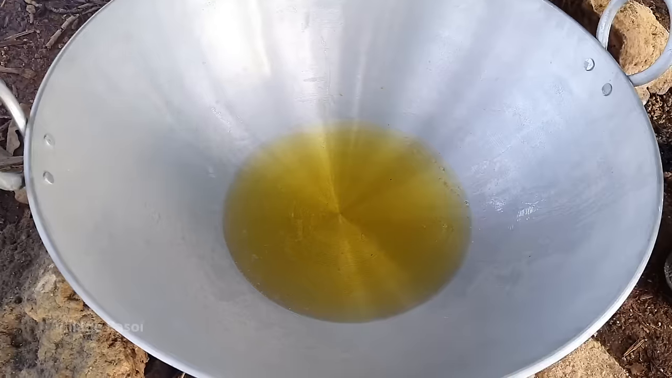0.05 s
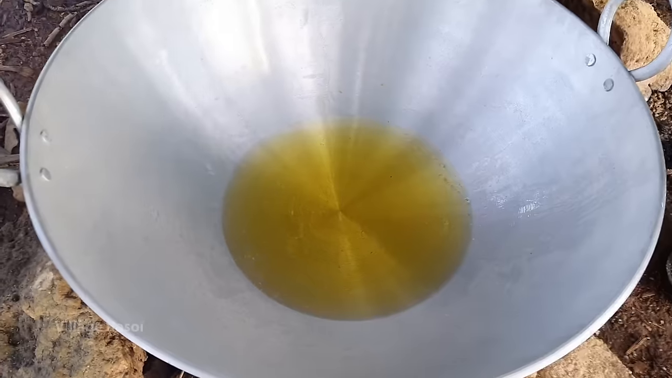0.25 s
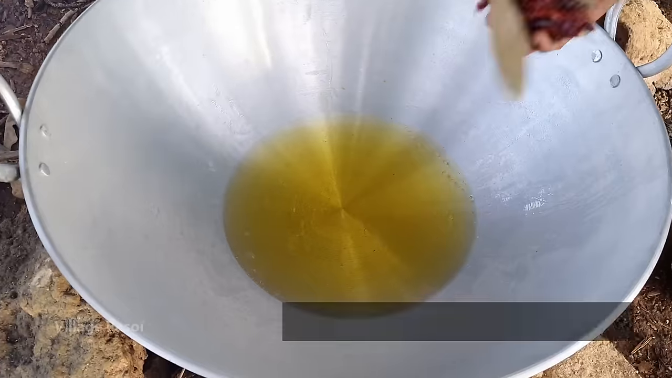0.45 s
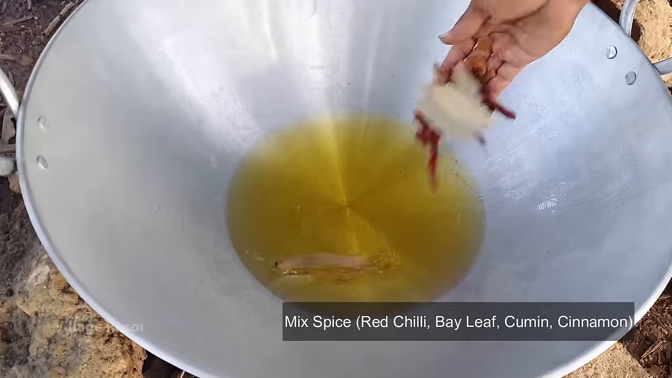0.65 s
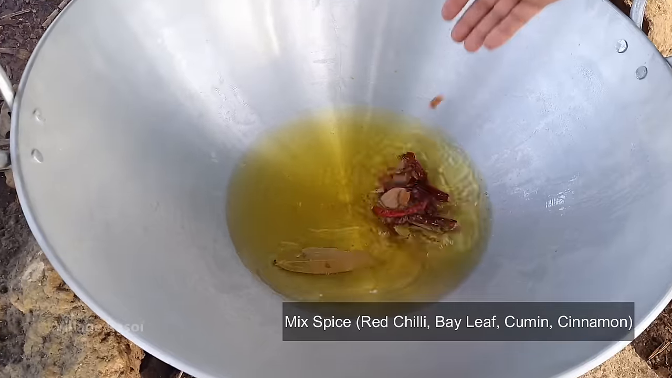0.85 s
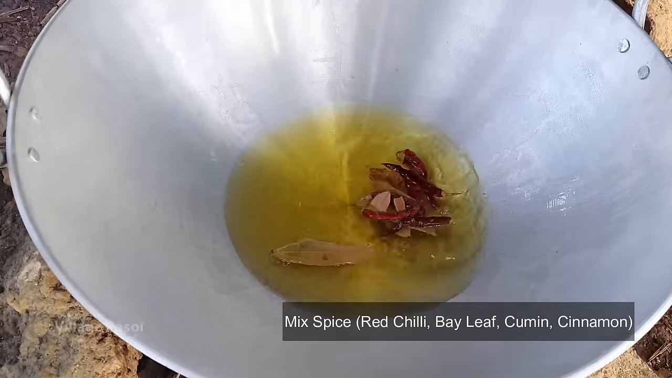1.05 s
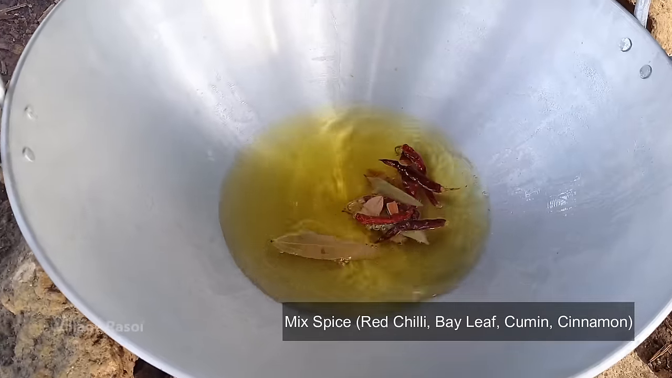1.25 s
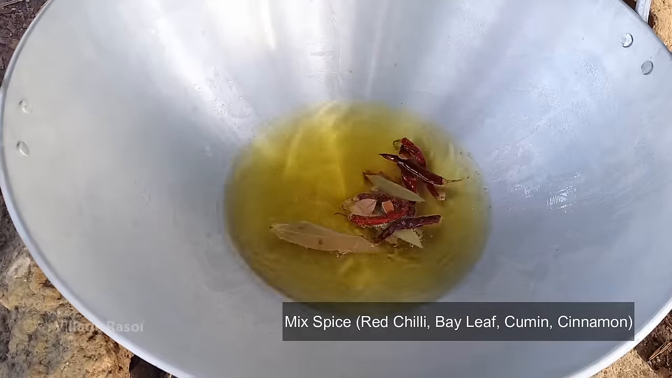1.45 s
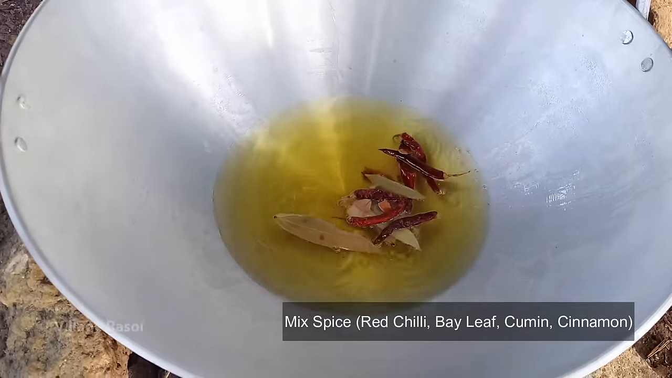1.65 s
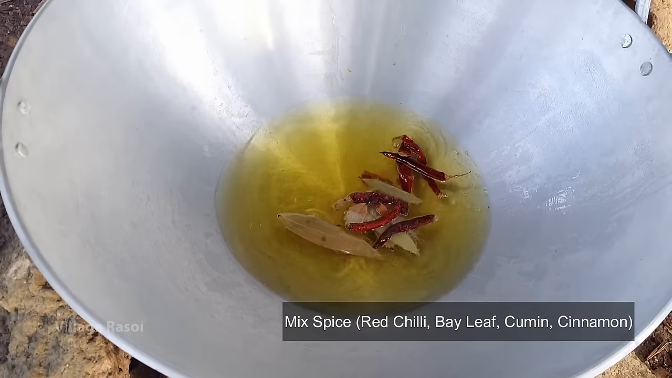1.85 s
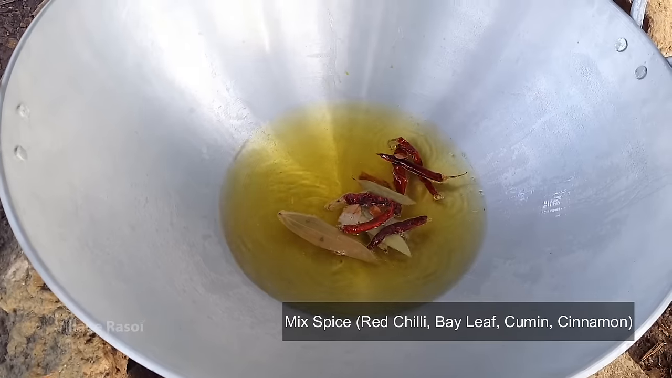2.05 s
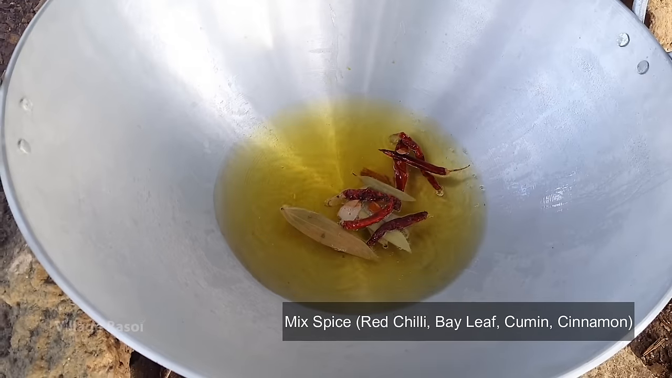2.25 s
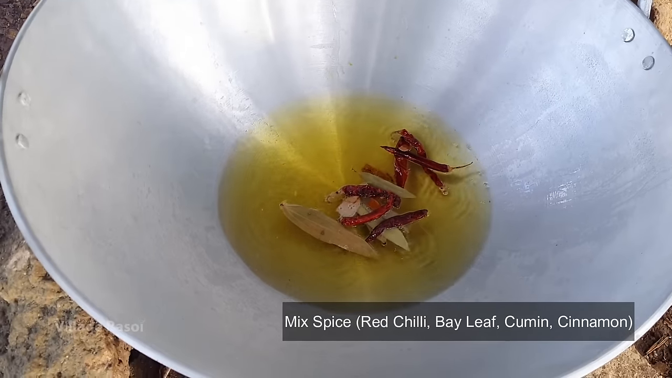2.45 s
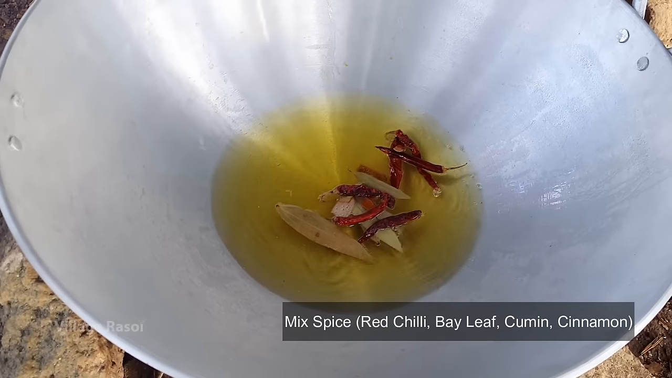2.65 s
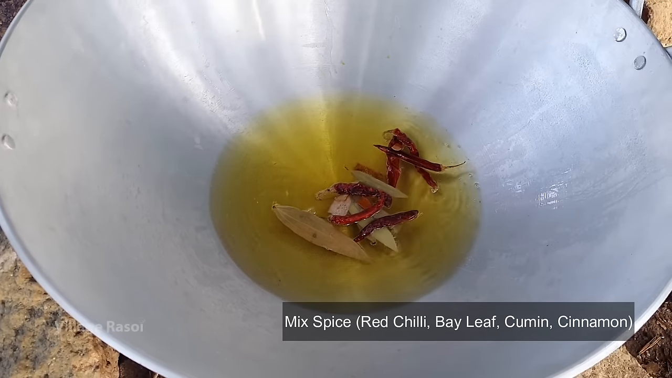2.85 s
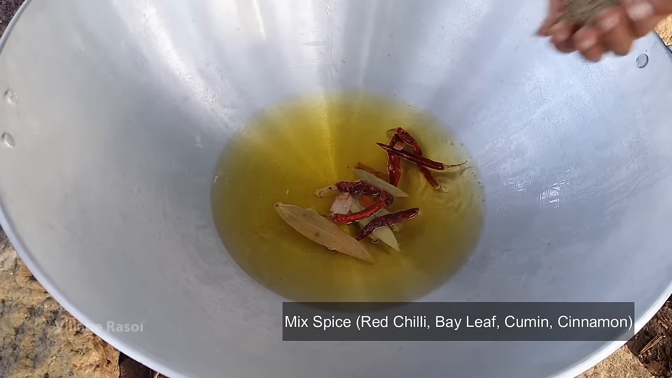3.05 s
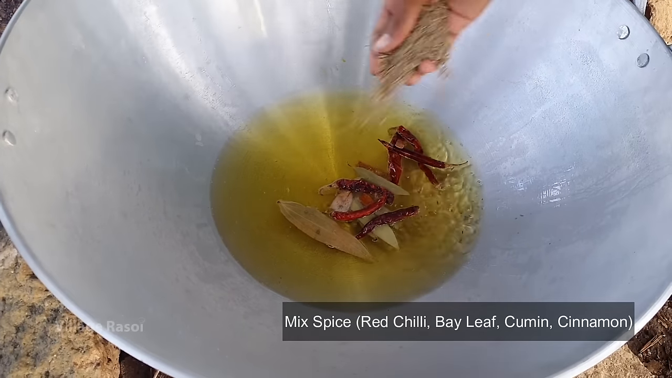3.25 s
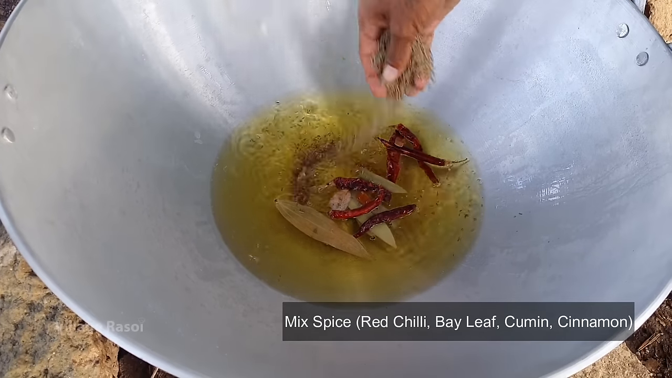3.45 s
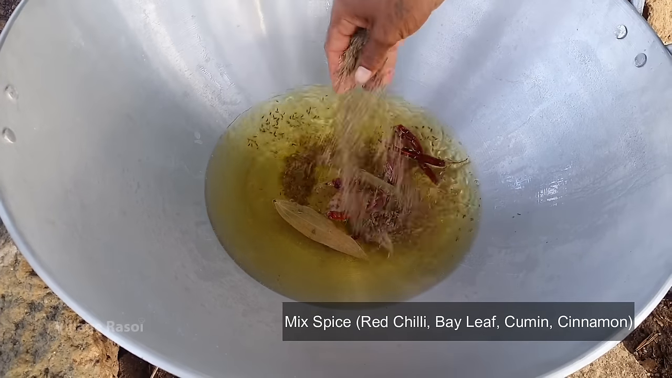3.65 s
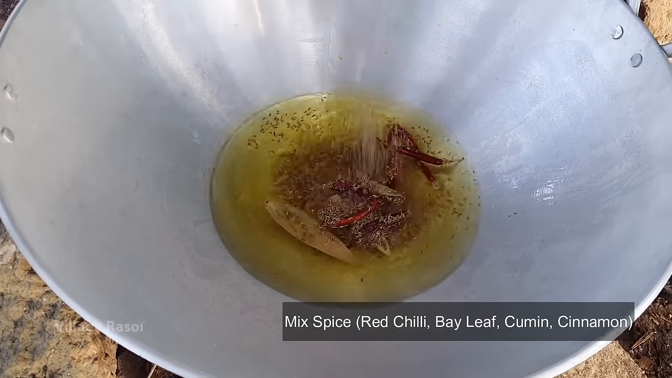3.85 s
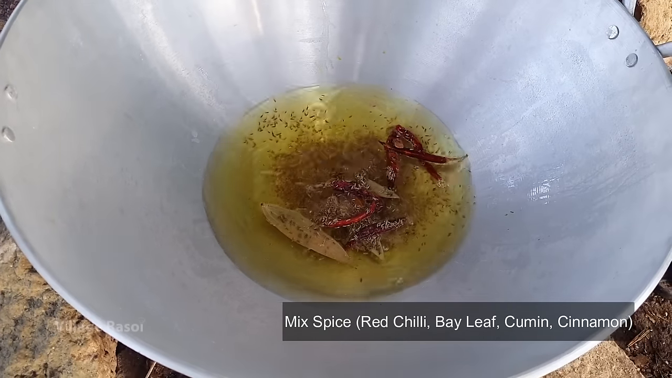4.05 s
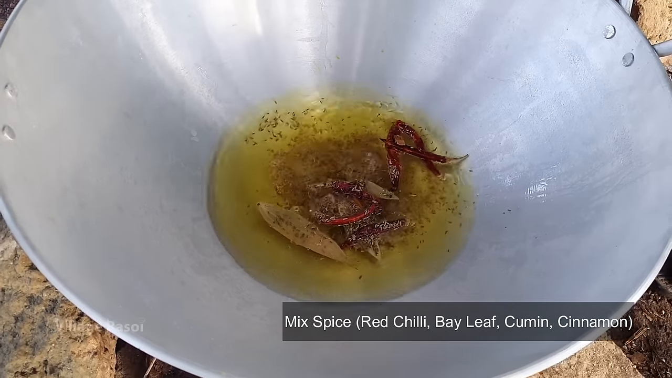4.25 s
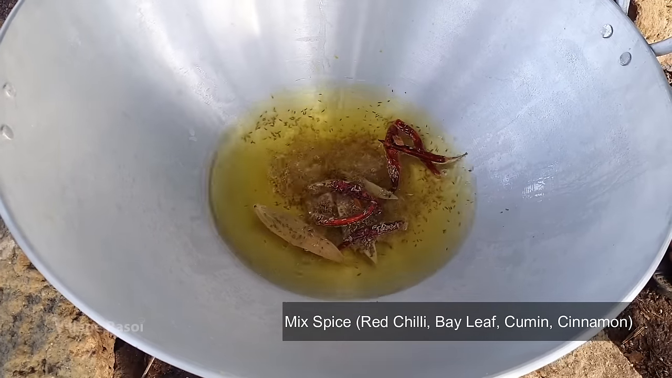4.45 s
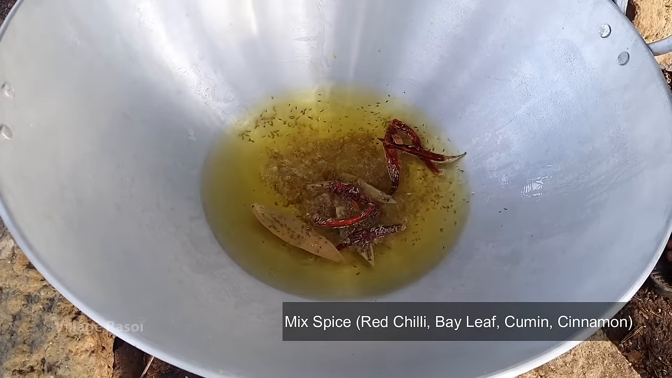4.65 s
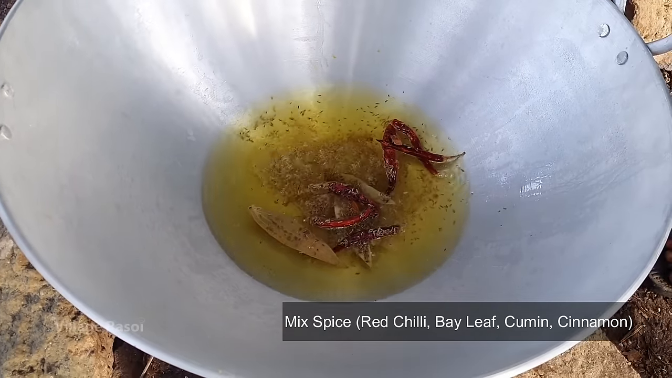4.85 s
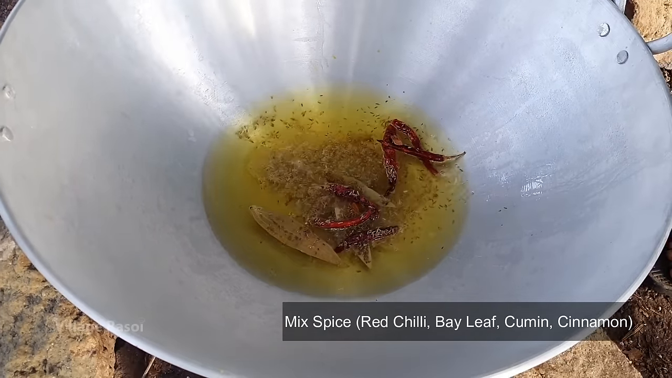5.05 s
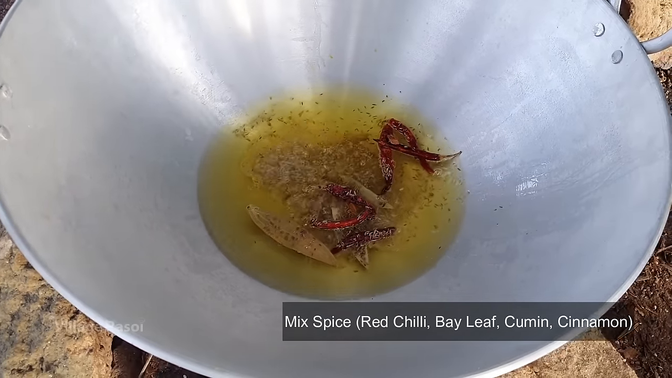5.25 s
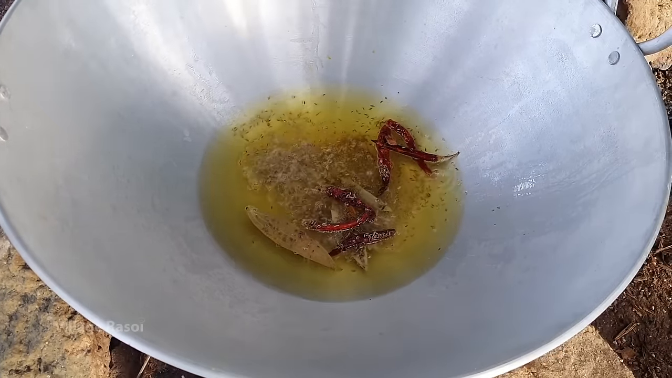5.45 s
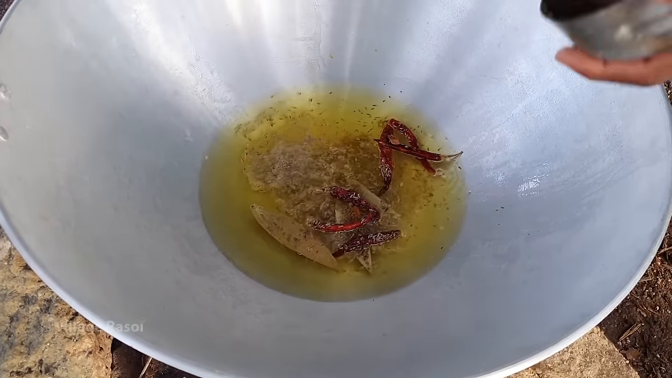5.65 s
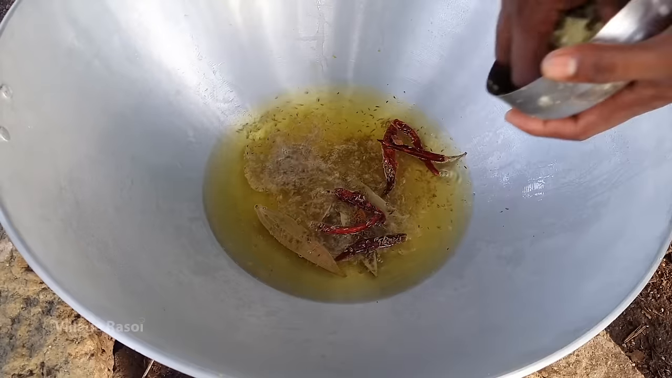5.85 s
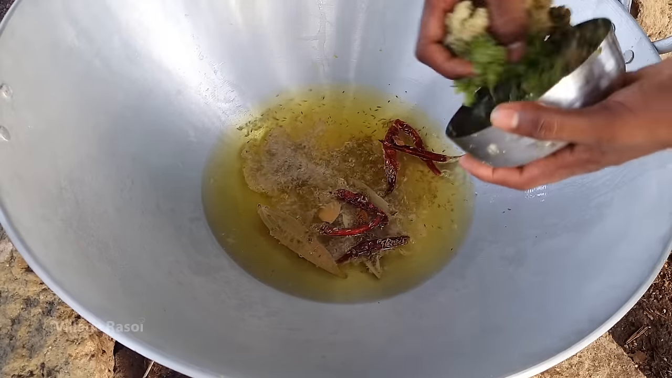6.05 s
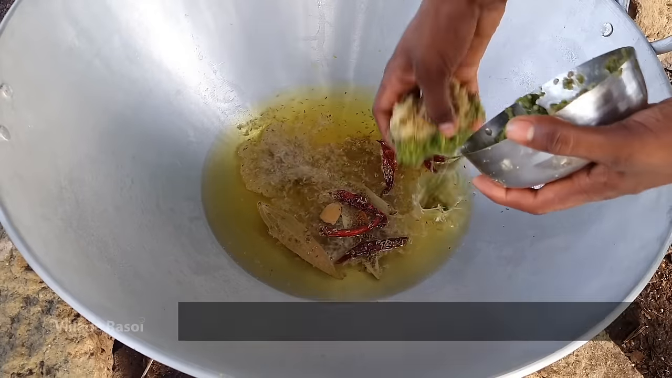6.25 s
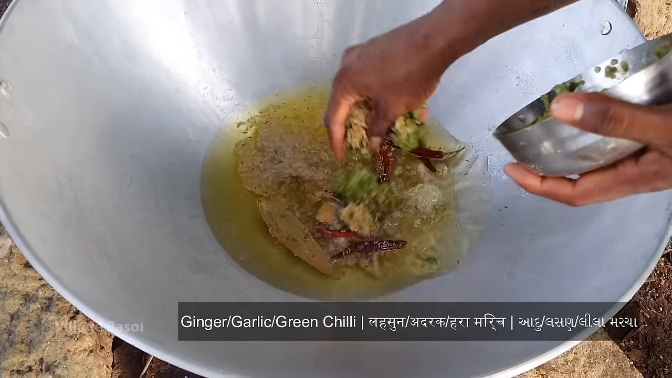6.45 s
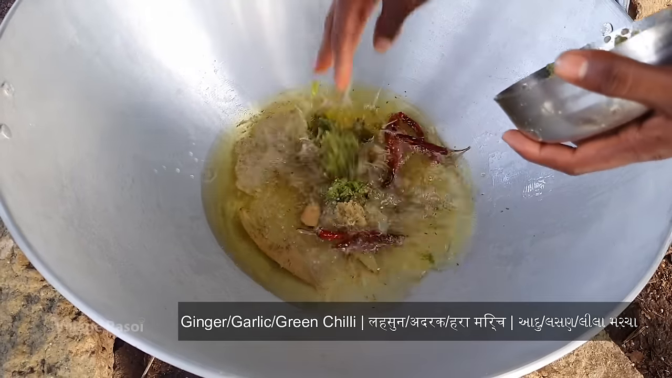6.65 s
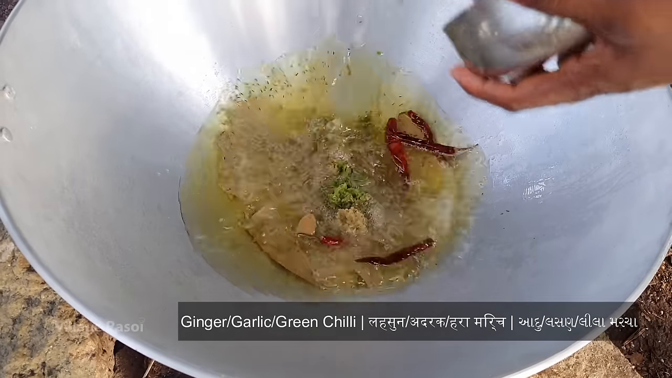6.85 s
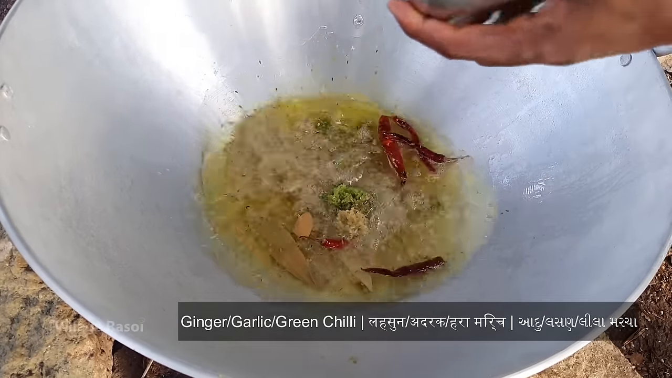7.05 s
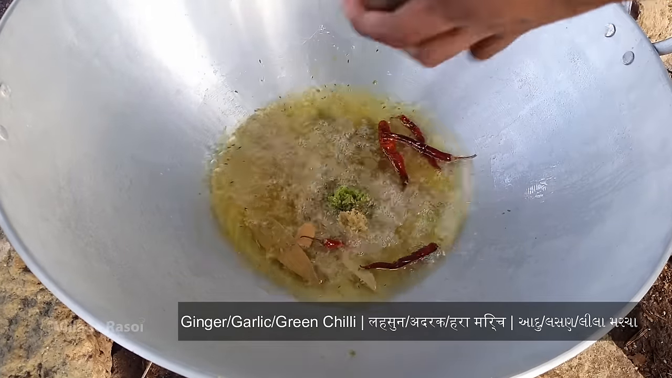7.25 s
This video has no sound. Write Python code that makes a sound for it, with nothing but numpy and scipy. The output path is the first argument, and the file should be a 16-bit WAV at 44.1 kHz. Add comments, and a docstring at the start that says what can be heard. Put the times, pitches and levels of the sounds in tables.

```python
"""After a moment of silence a small pop and a droplet tick, over the soft simmer of whole spices in oil.
Outdoors, a wide thin metal pan over a fire: each pop cracks, comes round the bowl and rings the pan's modes;
bubbles are clumped bursts of short rings; a steam leak whistles; wet paste at the end boils up loudly.
Filtered noise gives a low fire murmur, with a faint hum of the pan; dull knocks fall early on, a light wind
brushes the microphone, and far insects are a narrow hiss of noise that comes in and fades."""
import sys
import numpy as np
from scipy import signal
from scipy.fft import rfft, irfft
from scipy.io import wavfile

SR = 44100
rng = np.random.default_rng(int(sys.argv[2]) if len(sys.argv) > 2 else 0)


def wav_out(sig):
    """Save sig, one row per channel (or a flat mono array), as 16-bit PCM at SR to the path in sys.argv[1]."""
    wavfile.write(sys.argv[1], SR, np.round(np.clip(np.atleast_2d(sig).T, -1, 1) * 32767).astype(np.int16))


N = 321930
TIME = np.arange(N) / SR   # [s]


def amp(db):
    """Gain of a level in dB."""
    return 10 ** (np.asarray(db) / 20)


def rms_one(x):
    """Scaled to rms 1."""
    return x / np.sqrt(np.mean(x ** 2) + 1e-20)


def in_time(rows):
    """Columns of a curve, interpolated sample by sample."""
    s, *columns = np.transpose(rows)
    return [np.interp(TIME, s, column) for column in columns]


def colour(x, spectrum):
    """Causal (minimum-phase) filter with the given level in dB at each frequency in Hz."""
    hz, level_db = np.transpose(spectrum)
    grid = np.maximum(np.arange(2049) * SR / 4096, 1)
    cepstrum = irfft(np.log(amp(np.interp(np.log(grid), np.log(hz), level_db))))
    # Folding the cepstrum onto positive times makes the filter minimum-phase
    cepstrum[1:2048] *= 2
    cepstrum[2049:] = 0
    response = irfft(np.exp(rfft(cepstrum)))
    return signal.fftconvolve(x, response)[:len(x)]


def band(x, low_hz, high_hz):
    """Band-pass."""
    edges = [low_hz, min(high_hz, .45 * SR)]
    return signal.sosfilt(signal.butter(3, edges, "band", fs=SR, output="sos"), x)


def drift(rate):
    """Slow chance, spread 1: random points, rate per second, joined by straight lines."""
    points = rng.standard_normal(N // 20)
    return rms_one(np.interp(TIME * rate, np.arange(N // 20), points))


def add(out, s, sound):
    """Lay a sound into out at time s."""
    at = round(s * SR)
    out[at:at + len(sound)] += sound[:len(out) - at]


INSECT_HZ, INSECT_DB = 6800, -70


def insects():
    """Far insects: a narrow hiss of band-passed noise that comes in and fades over the middle seconds."""
    swell = np.sin(np.pi * np.clip((TIME - 1.3) / 3.9, 0, 1)) ** 0.24
    hiss = band(rng.standard_normal(N), INSECT_HZ - 250., INSECT_HZ + 250.0)
    return amp(INSECT_DB) * swell * rms_one(hiss)


# Colour of the wind on the microphone: (frequency [Hz], relative level [dB])
WIND_COLOUR = [(13, -47), (22, -12.5), (65, 2), (81, 0.5), (145, -16), (200, -19), (260, -44), (440, -120)]
# Gusts on the microphone, before a slow drift: (time [s], level [dB])
GUST_PEAKS = [(.65, -59), (.78, -49.5), (.95, -56.5), (1.25, -59), (1.58, -55.5), (1.82, -54), (3.24, -60),
              (3.7, -58.5), (4.4, -57.5), (4.59, -56), (5.2, -56.5), (5.4, -62), (6.9, -54)]
BREEZE_DB, GUST_RISE_DB_PER_S, GUST_FALL_DB_PER_S = -67.5, 197, 68


def wind():
    """A low breeze of filtered noise; each gust comes fast and dies away more slowly."""
    level_db = np.full(N, float(BREEZE_DB))
    for s, peak_db in GUST_PEAKS:
        below_db = np.maximum(GUST_RISE_DB_PER_S * (s - TIME), GUST_FALL_DB_PER_S * (TIME - s))
        level_db = np.maximum(level_db, peak_db - below_db)
    return amp(level_db + 1.7 * drift(13.0)) * rms_one(colour(rng.standard_normal(N), WIND_COLOUR))


# Low fire murmur, with a faint hum of the pan near 1.1 kHz: (frequency [Hz], relative level [dB])
MURMUR_COLOUR = [(76, -55), (130, -4), (221, -2.5), (313, 4.5), (397, -5), (610, -10), (718, -43),
                 (909, -24), (1020, 1.5), (1170, -0.5), (1500, -12), (1950, -42), (3300, -120)]
MURMUR_DB = -61   # level about which it drifts


def fire_and_pan_hum():
    """Low fire murmur, with a faint hum of the pan near 1.1 kHz: filtered noise that wanders in level."""
    murmur = rms_one(colour(rng.standard_normal(N), MURMUR_COLOUR))
    return amp(MURMUR_DB + 2.0 * drift(12.0)) * murmur


# Dull knocks, level before the soft onset: (time [s], level [dB], frequency [Hz], 60 dB decay [s])
KNOCK_TIMES = [(.305, -38, 71, 0.24), (.308, -43, 139, 0.11), (0.366, -27, 73, 0.3),
               (0.37, -34.5, 138, 0.089), (1.226, -43.5, 374, 0.12)]


def knocks():
    """Soft low blows: decaying sines that swell for a few ms and die."""
    out, t = np.zeros(N), np.arange(SR // 3) / SR
    for s, peak_db, hz, t60 in KNOCK_TIMES:
        onset = 1 - np.exp(-t / 0.0036)
        add(out, s, amp(peak_db - 60 * t / t60) * onset * np.sin(2 * np.pi * hz * t))
    return out


WHISTLE_HZ, WHISTLE_DB = 4920, -56   # before its drifts
WHISTLE_START_S, WHISTLE_RISE_S, WHISTLE_END_S, WHISTLE_FALL_S = 3.13, .1, 3.7, .08
SPURT_S, SPURT_DB, SPURT_WIDTH_S = 3.42, 6, 0.01   # one short spurt
SAG_HZ, SAG_S = 135, .16   # from the spurt on, the pitch sags by this much within this time


def whistle():
    """Steam leaking from a pod: a thin, unsteady tone with a weak octave creeps in, spurts and fades."""
    rise = np.clip((TIME - WHISTLE_START_S) / WHISTLE_RISE_S, 0, 1) ** 2
    fall = np.clip((WHISTLE_END_S - TIME) / WHISTLE_FALL_S + 1, 0, 1) ** 2
    level_db = WHISTLE_DB + SPURT_DB * np.exp(-((TIME - SPURT_S) / SPURT_WIDTH_S) ** 2)
    sag_hz = SAG_HZ * np.clip((TIME - SPURT_S) / SAG_S, 0, 1)
    pitch_hz = WHISTLE_HZ - sag_hz + 10. * drift(22.0) + 15.3 * drift(190.0)
    phase = 2 * np.pi * np.cumsum(pitch_hz) / SR
    tone = np.sin(phase) + amp(-31.0) * np.sin(2 * phase)
    return np.sqrt(2) * rise * fall * amp(level_db + 3.0 * drift(30.0)) * tone


# Droplet ticks, nominal level: (time [s], level [dB], centre [Hz])
DROPLETS = [(0.0276, -39, 6900), (0.0443, -40, 8700), (0.201, -45, 8100), (0.2303, -48, 8490),
            (0.2586, -45, 6900), (0.2867, -48, 6700), (0.313, -51, 6680), (0.3471, -41, 6450),
            (0.3588, -38.5, 8400), (0.431, -44, 6800), (0.7744, -40, 6870), (0.8625, -40, 7070),
            (0.9257, -37, 7180), (0.944, -33, 9560), (0.974, -35, 8700), (1.007, -21.5, 7850),
            (1.0855, -39.5, 8700), (1.1545, -44, 9200), (1.229, -42, 6800), (1.283, -40, 6860),
            (1.3505, -44, 7950), (1.397, -44, 9500), (1.456, -40.5, 6800), (1.553, -46, 8900),
            (1.5392, -47, 8610), (1.5815, -44, 9100), (1.8067, -46, 7000), (1.85, -38.5, 8800),
            (2.5845, -44, 7300), (2.6308, -45, 9900), (2.787, -50, 6500), (2.9302, -41.5, 6840),
            (3.3673, -44, 6900), (3.389, -42, 8150), (3.488, -36.5, 6800), (3.65, -40, 7110),
            (3.7, -41, 9400), (3.7648, -36, 6940), (3.8167, -38, 6550), (4.039, -49, 8300),
            (4.101, -42, 6860), (4.2183, -49, 9640), (4.456, -43, 6460), (4.5115, -37.5, 6900),
            (4.7037, -46.5, 8490), (4.754, -48, 8800), (4.9036, -42, 6900), (5.43, -42.5, 6700),
            (5.5625, -42.5, 6600)]
EDGE_DB, EDGE_SPREAD_DB = -6.5, 1   # fine edge against the nominal level, and its chance spread


def ticks():
    """A droplet bursts: a click of noise around its own pitch, with a very short fine edge on top."""
    out, t = np.zeros(N), np.arange(SR // 50) / SR
    noise = rng.standard_normal((len(DROPLETS), len(t)))
    for (s, peak_db, centre_hz), puff in zip(DROPLETS, noise):
        click = band(puff * amp(-60 * t / 0.0081), centre_hz / 1.29, centre_hz * 1.185)
        edge = band(puff * amp(-60 * t / 0.0055), 9500.0, 17000.)
        edge_db = peak_db + EDGE_DB + EDGE_SPREAD_DB * puff[-1]
        body = amp(peak_db + 3.5) * click / np.abs(click).max()
        add(out, s, body + amp(edge_db) * edge / np.abs(edge).max())
    return out


# Fresh spice meets the oil and splutters, gains before a slow drift:
# (start [s], end of hold [s], boil level [dB], spray level [dB], gurgle level [dB])
FRESH_SPICE = [(0.856, 0.898, -71, -53, -58), (0.923, 1.014, -53, -53.5, -47),
               (1.033, 1.045, -40, -56.5, -51), (1.092, 1.115, -48.5, -79, -48.5),
               (3.285, 3.417, -52.5, -61, -71), (3.489, 3.575, -49, -53, -85),
               (3.646, 3.727, -50, -59, -74), (3.765, 3.888, -46.5, -45, -55),
               (3.966, 4.043, -49.5, -53, -60), (6.029, 6.064, -70, -76, -64)]


def splutter(column):
    """Gain of the splutters for one size of bubble: a sudden start, a quick end."""
    out = np.zeros(N)
    for row in FRESH_SPICE:
        start = np.clip((TIME - row[0]) / 0.0073, 0, 1)
        end = np.clip((row[1] - TIME) / 0.021 + 1, 0, 1) ** 2
        out += amp(row[column]) * start * end
    return out


def bubbles(per_s, low_hz, high_hz, spread_db, cycles, count=7):
    """Bursts come in clumps; each rings a few cycles at one of several pitches."""
    born = rng.random(N) < per_s * amp(3. * drift(30.)) / SR
    sizes = amp(spread_db * np.minimum(rng.exponential(1, N), 5)) * rng.choice([-1, 1], N)
    bursts = born * sizes / np.sqrt(np.maximum(per_s, 50)) + 1e-18   # denser is smoother, not louder
    dealt, out = rng.integers(0, count, N), 0
    for k, hz in enumerate(np.geomspace(low_hz, high_hz, count)):
        r = amp(-60 * hz / (cycles * SR))   # down 60 dB after the given cycles
        resonator = [1, -2 * r * np.cos(2 * np.pi * hz / SR), r * r]
        ring = signal.lfilter([1, 0, -r], resonator, bursts * (dealt == k))
        out = out + np.sqrt(1 - r * r) * ring
    return rms_one(out)


# Colour the microphone gives the bubbles and the pops: (frequency [Hz], relative level [dB])
MIC_COLOUR = [(120, -67), (200, -12.5), (268, -15), (409, -23.5), (569, -18), (659, -16), (791, -11),
              (3900, 1), (4860, -4), (5630, -17.5), (6520, -12.5), (7680, -20.5), (9230, -18),
              (13600, -33.5), (16000, -33)]
# Vigour of the simmer, as level of the middle bubbles before a slow drift: (time [s], level [dB])
SIMMER_VIGOUR = [(0.02, -58.5), (0.39, -57.5), (0.62, -51.5), (0.86, -47.5), (1.25, -53.5), (1.7, -53),
                 (1.94, -51), (2.59, -52.5), (3.3, -53), (3.465, -55), (3.5, -47), (3.88, -45.5),
                 (4.14, -53), (4.6, -52.5), (5.15, -54), (5.42, -50), (6.3, -51.5)]
# Vigour of the boil-up when the wet paste lands, likewise: (time [s], level [dB])
PASTE_VIGOUR = [(6.385, -53.5), (6.43, -32), (6.46, -28), (6.62, -27), (6.69, -23), (6.76, -25.5),
                (6.85, -23.5), (7.07, -22.5), (7.3, -24)]
SIMMER_PER_S, BOIL_UP_PER_S = 600, 3800   # base rate of bursts; each size takes its own multiple
SIMMER_GURGLE_DB, GURGLE_FOLLOWS = -59, .45   # large bubbles at a vigour of -52 dB; share of its swing
BOIL_UP_GURGLE_DB, GURGLE_LAG_S = -11, 0.048   # in the boil-up they follow fully, a little late
# Fine spray against the middle bubbles; in the simmer it thickens as the spices cook
SIMMER_SPRAY_DB, SPRAY_GROWS_DB_PER_S, BOIL_UP_SPRAY_DB = -11.5, .5, -8
SPRAY_CROWD, SPRAY_CROWD_PER_S = 0.55, .15   # fine bursts per middle bubble at 0 s; gain each second


def frying():
    """Large bubbles gurgle, middle ones boil, the finest spray; a smooth hiss fills in between."""
    boil_db, = in_time(SIMMER_VIGOUR + PASTE_VIGOUR)
    wet = TIME > PASTE_VIGOUR[0][0]
    late_db, = in_time([(s + GURGLE_LAG_S, db) for s, db in PASTE_VIGOUR])
    simmer_spray_db = SIMMER_SPRAY_DB + SPRAY_GROWS_DB_PER_S * TIME
    spray_db = boil_db + np.where(wet, BOIL_UP_SPRAY_DB, simmer_spray_db)
    gurgle_db = SIMMER_GURGLE_DB + GURGLE_FOLLOWS * (np.minimum(boil_db, -46) + 52)
    gurgle_db = np.maximum(gurgle_db, late_db + BOIL_UP_GURGLE_DB)

    per_s = np.where(wet, BOIL_UP_PER_S, SIMMER_PER_S)
    spray_splutter = splutter(column=3)
    per_s = per_s * (1 + 1.5 * spray_splutter / amp(spray_db))   # a splutter is a crowd of bursts
    spray_per_s = (SPRAY_CROWD + SPRAY_CROWD_PER_S * TIME) * per_s

    hiss = rng.standard_normal(N)
    gurgle = bubbles(.3 * per_s, 280.0, 1650.0, spread_db=2.5, cycles=13.0) + 2.64 * hiss
    boil = bubbles(per_s, 1320.0, 5920.0, spread_db=3.5, cycles=13.0) + 2.33 * hiss
    spray = bubbles(spray_per_s, 5100.0, 16700.0, spread_db=5.0, cycles=4.0) + 1.43 * hiss
    gurgle = rms_one(band(colour(gurgle, MIC_COLOUR), 275.0, 1770.0))
    boil = rms_one(band(colour(boil, MIC_COLOUR), 1740.0, 6700.0))
    spray = rms_one(band(colour(spray, MIC_COLOUR), 5890.0, 17100.0))

    out = (amp(gurgle_db) + splutter(column=4)) * gurgle
    out += (amp(boil_db) + splutter(column=2)) * boil
    out += (amp(spray_db) + spray_splutter) * spray
    return out * amp(0.72 * drift(14.))


# Pops against the pan, nominal level: (time [s], level [dB], centre [Hz])
POP_TIMES = [(0.0199, -27, 3290), (0.3403, -28, 3330), (0.4376, -31.5, 3430), (0.4766, -33, 2380),
             (0.5404, -28, 3260), (0.5647, -19, 4300), (0.598, -21.5, 4000), (0.6609, -29.5, 2590),
             (0.7463, -18.5, 4750), (0.7725, -24, 2400), (0.838, -24, 4000), (0.9428, -26, 4550),
             (0.9654, -23, 3730), (1.0051, -26.5, 4700), (1.2246, -32.5, 3300), (1.3666, -20, 3400),
             (1.388, -27.5, 4230), (1.4855, -30, 3500), (1.512, -30, 3970), (1.6048, -33.5, 4000),
             (1.7668, -9.5, 3710), (1.8, -27, 4000), (1.8486, -26, 4100), (1.925, -27, 4040),
             (1.938, -27.5, 4380), (1.9778, -23.5, 4270), (2.0514, -8, 3660), (2.155, -33, 3200),
             (2.1805, -25.5, 3290), (2.3105, -23.5, 3260), (2.32, -16, 3400), (2.3925, -31.5, 2400),
             (2.4452, -14, 3800), (2.5057, -27, 3670), (2.7869, -8.5, 3730), (2.8887, -25.5, 3020),
             (2.9303, -15, 4170), (3.025, -36.5, 4000), (3.089, -34, 2460), (3.0994, -20, 4250),
             (3.2946, -35, 4470), (3.3647, -26.5, 3620), (3.475, -21, 4370), (3.4854, -29, 3920),
             (3.499, -25.5, 3440), (3.5539, -23, 2770), (3.7903, -24.5, 4280), (3.9095, -11, 3300),
             (4.076, -29.5, 3080), (4.1012, -25, 4600), (4.1978, -26, 3350), (4.43, -35, 3520),
             (4.455, -36.5, 2980), (4.5411, -36, 3160), (4.6247, -14, 3600), (4.6838, -35, 3600),
             (4.786, -33, 3380), (4.8267, -35.5, 2000), (4.904, -37.5, 2400), (4.986, -33.5, 3820),
             (5.0966, -35, 2780), (5.127, -31, 3700), (5.188, -35, 3260), (5.3009, -25, 3700),
             (5.357, -33, 2980), (5.4301, -31.5, 2800), (5.455, -35, 3280), (5.487, -39, 2970),
             (5.5503, -32, 3650), (5.68, -36.5, 3500), (5.875, -35.5, 2980), (5.91, -40.5, 3500),
             (6.052, -35.5, 3200), (6.178, -34.5, 3340), (6.269, -35, 3900), (6.317, -28, 3070),
             (6.419, -26.5, 4400), (7.05, -13, 3740), (7.249, -15, 3000)]
# Modes of the pan; each pop scales the decays together:
# (frequency [Hz], relative level [dB], 60 dB decay at a pop decay of 0.094 s [s])
PAN_MODES = [(1636, 14.5, 0.068), (1897, 7.5, 0.075), (2035, 14.5, 0.092), (2400, 12.5, 0.092),
             (2490, -23, 0.1), (2920, 2, 0.2), (2920, 8, 0.071), (3200, -5, 0.24), (3290, 8, 0.084),
             (3337, 10.5, 0.078), (3590, -5, 0.17), (3540, -16, 0.11), (3763, 6.5, 0.13), (3950, 5, 0.074),
             (4075, 3, 0.09), (4250, 0.5, 0.12), (4378, 8, 0.1), (4854, 8, 0.057)]
# The wave runs round the bowl and returns, before loss and scatter: (delay [s], relative level [dB])
BOWL_RETURNS = [(0, -15), (.0026, 7), (.0051, 2), (.0070, 7.5), (.0098, 4)]
POP_DECAY_S, DAMPING_PER_S = 0.13, 0.14   # decay scale in the bare pan; it shortens as the pan fills
POP_OCTAVES, NARROWING_PER_S = 1.246, 0.083   # reach of a pop in the bare pan; narrower as the pan fills
NARROWING_PER_DB, NARROW_ABOVE_DB = .04, -20   # strong pops are narrower still
ROUND_LOSS_DB_PER_S = 1.1   # the returns round the bowl weaken as the pan fills


def pops():
    """A pop is a short crack that comes round the bowl, rings its modes and leaves a dying rush."""
    out, t = np.zeros(N), np.arange(SR // 6) / SR
    hz, mode_db, t60 = np.transpose(PAN_MODES)[:, :, None]
    modes, rounds = len(PAN_MODES), len(BOWL_RETURNS)
    chance = rng.standard_normal((len(POP_TIMES), 2 * modes + rounds))
    snap = colour(1. * (t == 0), MIC_COLOUR)
    rush = colour(rng.standard_normal(len(POP_TIMES) * len(t)), MIC_COLOUR).reshape(len(POP_TIMES), -1)
    for (s, peak_db, centre_hz), luck, noise in zip(POP_TIMES, chance, rush):
        decay = POP_DECAY_S * np.exp(-DAMPING_PER_S * s)
        strong_db = max(peak_db - NARROW_ABOVE_DB, 0)
        octaves = POP_OCTAVES - NARROWING_PER_S * s - NARROWING_PER_DB * strong_db
        reach = 2 ** np.clip(octaves, .2, 1.5)

        # Modes near the pop's own pitch are struck best
        distance = np.log(hz / centre_hz) / np.log(reach)
        near_db = np.where(hz > centre_hz, -12., -8.) * distance ** 2
        strength = amp(mode_db + near_db + 2.3 * luck[:modes, None])
        phase = 2 * luck[modes:-rounds, None]
        fading = amp(-60 * t / (t60 * decay / 0.094))
        ring = (strength * fading * np.sin(2 * np.pi * hz * t + phase)).sum(axis=0)
        ring = ring * (1 - np.exp(-t / 0.00047))

        crack = np.zeros(len(t))
        for (lag, round_db), scatter in zip(BOWL_RETURNS, luck[-rounds:]):
            loss_db = ROUND_LOSS_DB_PER_S * s * (lag > 0)   # the direct crack loses nothing
            add(crack, lag, amp(round_db - loss_db + 0.8 * scatter) * snap)
        crack = band(crack, centre_hz / reach ** 0.64, centre_hz * reach ** 0.64)

        tail = band(noise, centre_hz / reach, centre_hz * reach ** 0.63) + 0.17 * noise
        tail = tail * amp(-60 * t / (0.86 * decay))

        sound = crack / np.abs(crack).max()
        sound += amp(-4.0) * ring / np.abs(ring).max()
        sound += amp(-4.0) * tail / np.abs(tail).max()
        add(out, s, amp(peak_db - 2.0) * sound)
    return out


def scene():
    """Field, wind and fire behind the pan, in one channel."""
    background = insects() + wind() + fire_and_pan_hum()
    pan = knocks() + whistle() + ticks() + frying() + pops()
    return (background + pan)[None]


START_S = 0.016   # the microphone opens
TOP_HZ = 16050   # from here up the sound is 60 dB down


def record(dry):
    """The microphone opens after a moment of silence; the top is cut."""
    opened = dry * np.clip((TIME - START_S) / 0.0029, 0, 1)
    return signal.sosfilt(signal.cheby2(14, 60, TOP_HZ, fs=SR, output="sos"), opened)


dry = scene()
out = record(dry)
wav_out(out)
```